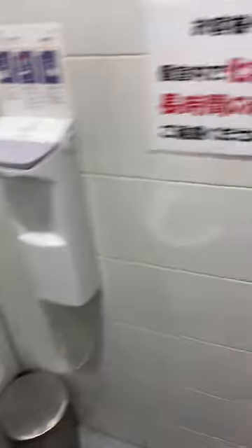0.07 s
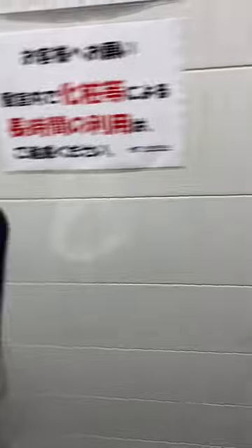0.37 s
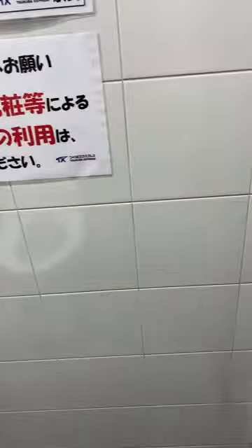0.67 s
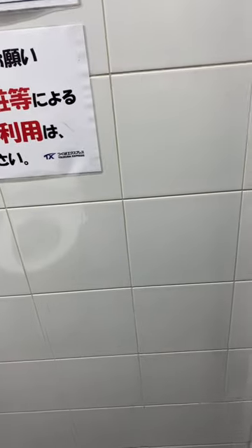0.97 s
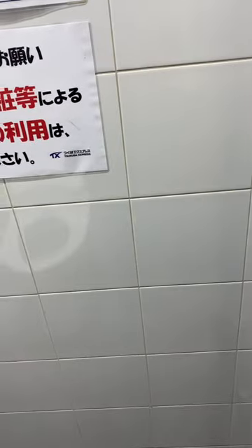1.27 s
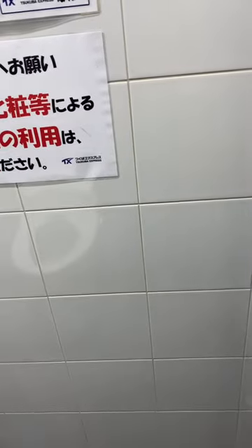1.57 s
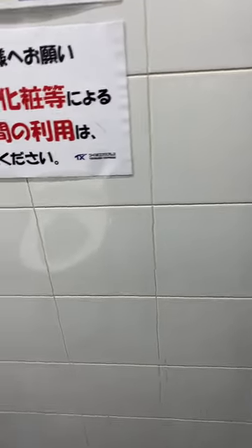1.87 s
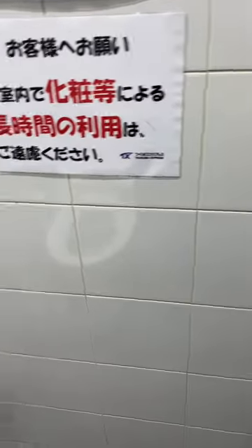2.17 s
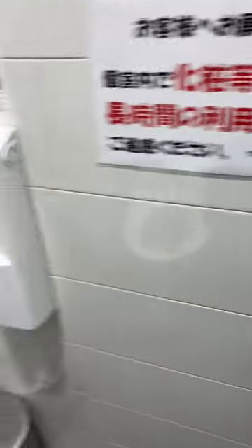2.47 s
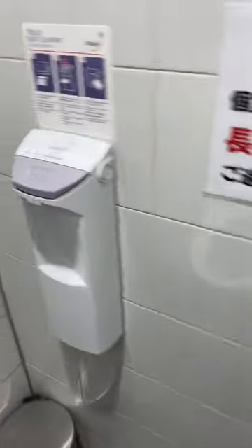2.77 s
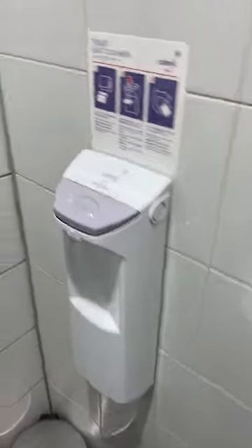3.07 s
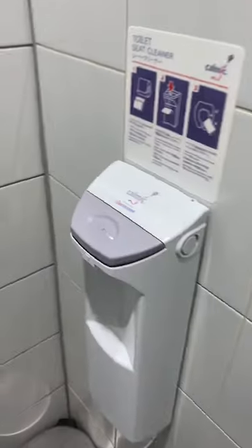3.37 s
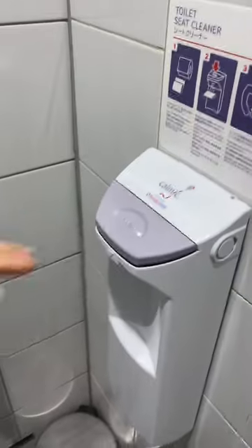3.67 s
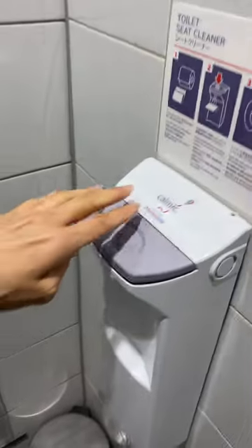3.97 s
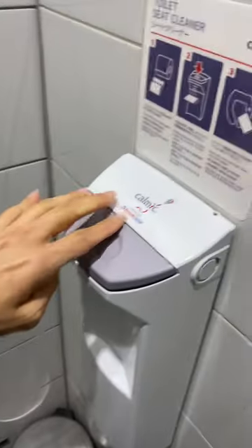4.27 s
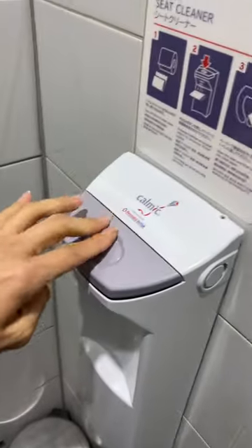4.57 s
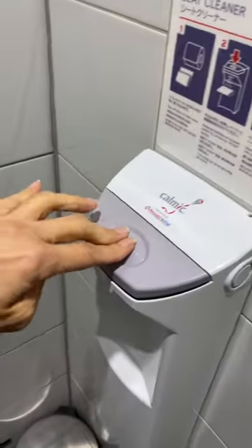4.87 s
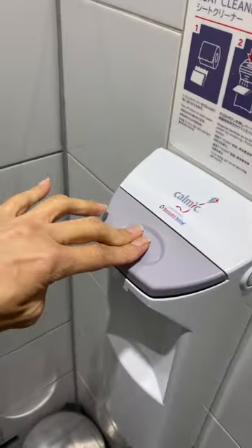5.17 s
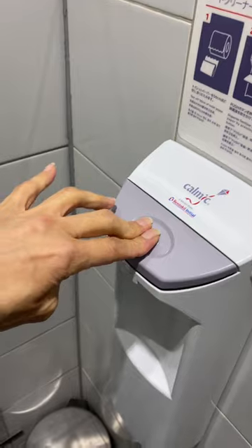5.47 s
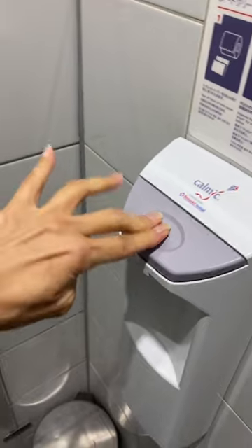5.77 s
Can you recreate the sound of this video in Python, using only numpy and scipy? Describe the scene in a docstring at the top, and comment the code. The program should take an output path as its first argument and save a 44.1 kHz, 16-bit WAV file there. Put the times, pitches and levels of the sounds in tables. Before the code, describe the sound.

A light knock on a partition is followed by a booming stall door, whose metal latch clatters around a small, hard restroom before the hinge gives a tiny chirp. Clothing brushes softly near the microphone. Later come faint finger taps on a plastic wall dispenser and one firm press, which clunks, sprays briefly and rattles as it releases. A low ventilation hum runs underneath throughout.

```python
"""An extractor fan hums in a small tiled toilet stall, and a sleeve rustles close by.
A hollow partition is bumped, then a door bangs shut: its panel booms, its steel latch clatters
round the hard room and its hinge chirps. Fingers tap and rub a plastic dispenser, then press it:
the shell gives a hollow clunk, liquid hisses through the nozzle, and the button rattles back."""
import sys
import numpy as np
from scipy import signal
from scipy.fft import rfft, irfft, next_fast_len
from scipy.io import wavfile
from scipy.ndimage import map_coordinates

SR = 44100
rng = np.random.default_rng(int(sys.argv[2]) if len(sys.argv) > 2 else 0)


def generate_wav(sig):
    """Save sig (samples, or channels by samples) to the path in sys.argv[1] as 16-bit PCM at SR."""
    pcm = np.round(np.clip(np.atleast_2d(sig).T, -1, 1) * 32767).astype(np.int16)
    wavfile.write(sys.argv[1], SR, pcm)


N = 261513
TIME = np.arange(N) / SR  # seconds through the scene
HIT = np.arange(SR) / SR  # seconds after a blow

# A COLOUR says how strong low and high pitches are next to each other (f/Hz, level/dB).
DUCT_COLOUR = [(10, -33), (22, -11.5), (38, -5), (62, -0.5), (76, -7), (95, 1), (130, 3.5), (165, -8),
               (188, -4), (215, -15.5), (370, -17.5), (470, -24), (850, -25.5), (960, -34), (1200, -31.5),
               (1800, -46), (5000, -53.5), (15500, -76.5)]  # air in the fan's duct
CLOTH_COLOUR = [(300, 4), (1500, 0), (2500, 1.5), (4000, -2), (7000, -6), (10000, -10), (12300, -11),
                (13500, -22.5), (16000, -24.5)]  # cloth rubbing on cloth
HISS_COLOUR = [(1500, -28.5), (3500, -11), (5500, 2.5), (7300, -6), (9500, -3.5), (12000, -7),
               (14000, -19.5)]  # quick, light brushes of cloth
PARTITION_COLOUR = [(150, -16.5), (300, -3.5), (430, -0.5), (560, -1), (700, -0.5), (880, -5), (990, -13),
                    (1400, -16.5), (4000, -61.5)]  # the partition's hollow body
EDGE_COLOUR = [(300, -25), (900, -2), (1400, -2), (2100, 2), (3600, -3), (5600, -11), (9500, -9),
               (12000, -13), (15500, -27)]  # its metal edge
WOOD_COLOUR = [(20, -40), (60, -15.5), (170, 1.5), (330, -5.5), (480, 1), (600, -2), (850, -5.5),
               (1300, -12.5), (2000, -24), (6000, -53.5)]  # a knock on the door
BOLT_COLOUR = [(300, -36), (1100, -4), (1500, -16), (1900, -14), (2150, 1), (2700, -1), (3200, 2),
               (3850, 0), (4250, -10), (5200, -11), (6000, -2), (7400, -5), (8600, -3), (9600, -9),
               (12300, -8), (13500, -16), (15500, -18)]  # the latch's sliding bolt
PLATE_COLOUR = [(300, -30), (900, -3), (1500, -4), (2300, 2), (3600, -1), (4300, -5), (5100, -2),
                (6200, -4), (7400, -4), (9700, -11), (11500, -7), (15500, -21)]  # the strike plate on the frame
TICK_COLOUR = [(200, 1.5), (900, 1.5), (1600, -1.5), (2500, 2.5), (3600, -4.5), (5400, -6.5), (8000, -16.5),
               (15500, -27.5)]  # a tick on plastic
NOZZLE_COLOUR = [(200, 1), (600, 4), (1000, -2.5), (1300, 1), (1800, -3.5), (2200, 0), (3100, -2.5),
                 (3400, -10.5), (3850, -6.5), (4400, -6.5), (5400, -9.5), (8000, -13.5), (15500, -19.5)]  # liquid leaving the nozzle

# NOTES ring when a thing is struck (f/Hz, level/dB, fade/s). A fade is the time to drop by 60 dB.
BOARD_NOTES = [(405, -3, .22), (461, 0, 0.245), (646.5, -1, 0.11), (742, -3, .08), (837, -9, .16),
               (888, -10, .12)]  # the partition's board
WOOD_NOTES = [(325.3, -4.5, .63), (458, -5.5, .6), (569, -1, 0.35), (651, -2, .7), (996, -11, .38),
              (1109.4, -7.5, 0.61), (1384, -13.5, 0.42)]  # the door's higher notes
BOLT_NOTES = [(2085, 0, .22), (2194, -2, .17), (2326, -3, .2), (2509, -5, .17), (3085, 4, .18),
              (3402, 0, .13), (3690, 0, .12), (4014, -2, .18), (5798, -5, .07), (6087, 0, .2),
              (8940, 0, .14)]  # the steel bolt
PLATE_NOTES = [(1195, -3, .4), (1744, 1, .28), (1820, -3, .28), (2310, 0, .18), (2617, -1, .2),
               (3790, -3, .18), (4893, -4, .25), (6330, -2, .15), (6920, 4, .14)]  # the strike plate
PANEL_NOTES = [(47, -12, 0.79), (72.6, -3, 0.3), (82.4, 0, .22), (110.7, 7.5, 0.13), (129.2, 0.34, 0.64),
               (151, -4, 0.28), (192, -19, 0.8)]  # the door's deep notes
SHELL_NOTES = [(245, -11.5, 0.13), (383, -16, 0.06), (498, -9, 0.065), (582, -1.5, 0.064),
               (729, -9.5, 0.05), (1200, -28, 0.09), (2140, -18, 0.022), (2470, -30, 0.1)]  # the dispenser's hollow shell
LID_NOTES = [(819, -0.5, 0.04)]  # its lid

# BANDS are the pitch ranges in which a part colours noise (f/Hz, width/Hz, level/dB).
LID_BANDS = [(473, 210, -2.5), (620, 250, 11), (820, 84, 1), (2650, 260, -6), (5000, 700, -14),
             (8500, 2700, -26)]  # the lid under the skin
HOLLOW_BANDS = [(557, 96, -1.5), (827, 106, 1), (1173, 70, -9), (2440, 89, -5), (2530, 78, -8),
                (2800, 50, -9), (3100, 60, -8), (3640, 70, -17), (3800, 50, -14), (4600, 50, -13)]  # the hollow under the nozzle
BUTTON_BANDS = [(550, 360, 2), (850, 280, 0)]  # the pump button

# the hum of the fan blades and the mains (f/Hz, level/dB)
HUM_TONES = [(59.2, -58.5), (129.2, -43.5), (242.2, -62), (301.5, -59.5), (393.0, -63), (586.8, -83),
             (699.8, -74)]
# the grille's whistle, louder or softer as the camera moves (t/s, level/dB, f/Hz)
GRILLE_WHISTLE = [(0, -68, 827), (2.0, -67.5, 848), (2.4, -66, 843), (2.9, -73, 828), (3.17, -64, 832),
                  (3.33, -57.5, 830), (3.48, -62, 828), (3.6, -64, 826), (3.88, -70, 836), (4.01, -60, 825),
                  (4.1, -66, 843), (4.3, -62.5, 860), (5.93, -61.5, 852)]
# the sleeve brushes the body (peak t/s, rub level/dB, hiss level/dB, half length/s)
SLEEVE_BRUSHES = [(0.02, -56.5, -64.5, 0.22), (0.52, -60, -87, 0.23), (0.945, -58.5, -69, 0.13),
                  (1.196, -59.5, -73.5, 0.24), (1.94, -58, -70.5, 0.14), (2.17, -47.5, -59, 0.1),
                  (2.876, -59.5, -57, 0.032), (3.037, -64.5, -65, 0.15), (3.969, -63.5, -68.5, 0.064),
                  (4.95, -72.5, -80.5, .14)]
# bumps on the partition (t/s, body level/dB, edge level/dB, board level/dB)
PARTITION_BUMPS = [(0.243, -58, -49.5, -70), (.251, -42, -43, -46), (.2615, -33.5, -42.5, -37),
                   (.294, -41, -72, -35), (.311, -44, -74, -30), (.346, -44, -74, -34)]
# door and latch hit the frame (t/s, wood level/dB, bolt level/dB, plate level/dB, tilt/dB per octave)
DOOR_CONTACTS = [(1.391, -65, -52.5, -70, 1.5), (1.408, -37, -47.5, -45, -3), (1.514, -51, -54, -58, -0.5),
                 (1.533, -40, -41, -38, -4), (1.538, -35, -35, -33, -4), (1.549, -31, -30, -46, -2),
                 (1.558, -30.5, -27, -46, -1.5), (1.571, -27, -20, -44.5, 2), (1.577, -30, -26.5, -44, 1.5),
                 (1.592, -29.5, -42, -60.5, 0.5), (1.612, -36, -47, -70, -3), (1.6505, -30, -42.5, -24, -2),
                 (1.658, -33.5, -43, -29.5, -2), (1.692, -36, -45.5, -31, 6),
                 (1.983, -51, -58.5, -52.5, -1.5)]
# the door panel thuds, each blow with its own tilt toward deeper or higher notes
# (t/s, level/dB, tilt/dB per octave)
DOOR_THUDS = [(1.419, -14, -3), (1.481, -13.5, 7), (1.531, -14.5, 3), (1.59, -18.5, -1),
              (1.6463, -19.5, -0.5), (1.771, -23, 7)]
# the hinge slips (t/s, level/dB, f/Hz, rise/s)
HINGE_CHIRPS = [(1.982, -43, 3480, .0015), (1.984, -53, 2400, .003), (1.986, -54, 6190, .006),
                (1.995, -52, 2080, .003)]
# taps on the dispenser
# (t/s, shell level/dB, lid level/dB, tick level/dB, scrape on top of tick/dB, tilt/dB per octave)
DISPENSER_TAPS = [(3.622, -44, -50, -45, -2, -6), (3.648, -40.5, -51, -53, 1, -9),
                  (4.199, -72, -73, -48.5, -9.5, 1.5), (4.52, -43.5, -48, -72, -4, 0),
                  (4.565, -44, -57, -66, -5, 1), (4.588, -58, -56, -55, -3, 4),
                  (4.612, -42.5, -50, -71.5, -2.5, 4), (4.657, -37.5, -44, -55, -4, 5.5),
                  (4.723, -67, -62, -58.5, -3, 0.5), (5.547, -16, -34, -38.5, 3, -1.5),
                  (5.686, -31.5, -32, -55.5, 6, -2), (5.726, -30.5, -32, -51.5, 7, -1),
                  (5.759, -48, -52, -38, 2.5, 1.5), (5.787, -34, -34, -41, 5.5, -1.5),
                  (5.795, -31.5, -28, -37, 3.5, -1)]
# fingertips drag on the lid (t/s, length/s, drag level/dB, squeak level/dB, squeak f/Hz)
FINGER_RUBS = [(4.392, .003, -64, -67, 2620), (4.579, 0.045, -51.5, -68.5, 2637),
               (4.651, 0.013, -55, -67, 2670), (5.151, 0.097, -69.5, -77, 2520)]
# the button rattles on its way back and again as it seats (t/s, hold/s, level/dB)
BUTTON_RATTLES = [(5.688, .048, -46), (5.792, .018, -42)]

# how long the tiles echo (f/Hz, fade/s)
TILE_ECHO = [(60, 1.3), (130, 1.6), (300, 1.3), (600, 0.72), (1000, 0.55), (2000, 0.26), (6000, .3),
             (15000, 0.13)]
# how alike left and right are for sound from all sides (f/Hz, likeness from 0 to 1)
SIDE_LIKENESS = [(100, 1), (250, 1), (550, 0.58), (1500, 0.51), (2800, 0.94), (5000, 0.54), (7200, 1),
                 (10000, 0.96), (15000, 0.59)]
# how far the left wave runs ahead of the right (f/Hz, phase/radians)
LEFT_LEAD = [(1900, 0), (2900, 1.7), (4200, 1.5), (5300, -1.64), (6400, 4), (7000, 2.5), (7800, 3),
             (8400, 4.5), (9700, 7.5), (11200, 5.5), (12800, 11), (14300, 2.5), (15600, 0.5)]
# how much louder the left is than the right (f/Hz, level/dB)
LEFT_BALANCE = [(40, 1), (130, -1.3), (500, -3.5), (1200, 0.5), (3000, -.5), (8000, -0.1)]


def amp(db):
    """Turn decibels into a number to multiply by."""
    return 10 ** (np.asarray(db) / 20)


def unit(x):
    """Scale a sound so that its average strength (rms) is 1."""
    return x / np.sqrt(np.mean(x ** 2) + 1e-20)


def along(points, hz):
    """Read a table of (f/Hz, value) at any pitch, on a log scale."""
    f, v = np.transpose(points)
    return np.interp(np.log(hz + 1), np.log(f), v)


def swell(s, hold, rise_s, fall_db_per_s):
    """A strength that rises until time s, holds, then dies away."""
    rise = np.clip(1 + (TIME - s) / rise_s, 0, 1)
    return rise * amp(-fall_db_per_s * np.maximum(TIME - s - hold, 0))


def hump(peak_s, half_s):
    """A bell-shaped rise and fall in strength."""
    return np.exp(-((TIME - peak_s) / half_s) ** 2)


def fade_in(rise_s):
    """Soften the start of a blow."""
    return 1 - np.exp(-HIT / rise_s)


def wobble(rate):
    """A smooth curve through rate random points a second."""
    return map_coordinates(rng.standard_normal(int(N * rate / SR) + 4), [TIME * rate])


def wavering(hz, rate, steady):
    """A randomly shaken tone; the steadier, the purer it sounds."""
    phase = 2 * np.pi * np.cumsum(hz * np.ones(N)) / SR
    shake = steady + wobble(rate) + 1j * wobble(rate)
    return unit(np.real(shake * np.exp(1j * phase)))


def filtered(x, response):
    """Change the strength and phase of each pitch in x by response(hz)."""
    size = next_fast_len(x.shape[-1] + 8192)
    hz = np.fft.rfftfreq(size, 1 / SR)
    return irfft(rfft(x, size) * response(hz), size)[..., :x.shape[-1]]


def diffuse(size):
    """White noise from all sides, as two close microphones hear it."""
    def shares(hz):
        alike = np.clip(along(SIDE_LIKENESS, hz), 0, 1)
        return np.sqrt([(1 + alike) / 2, (1 - alike) / 2])
    mid, side = filtered(rng.standard_normal((2, size)), shares)
    return np.array([mid + side, mid - side])


def rush(colour):
    """Steady stereo noise with the given colour."""
    return unit(filtered(diffuse(N), lambda hz: amp(along(colour, hz))))


def resonant(bands):
    """Stereo noise that is strong in the given bands and weak between them."""
    def peaks(f):
        return sum(amp(db) * (1j * f * width / (hz * hz - f * f + 1j * f * width)) ** 2
                   for hz, width, db in bands)
    return unit(filtered(diffuse(N), peaks))


def click(colour, tilt=0, size=2048):
    """A coloured click; a positive tilt, in dB per octave, brightens it above 1000 Hz."""
    hz = np.fft.rfftfreq(size, 1 / SR)
    strength = amp(along(colour, hz) + tilt * np.log2(np.maximum(hz, 1000)))
    # pack the energy at the very start (minimum phase)
    cepstrum = irfft(np.log(strength))
    cepstrum[1:size // 2] *= 2
    cepstrum[size // 2 + 1:] = 0
    pulse = irfft(np.exp(rfft(cepstrum)))
    return np.pad(pulse / np.linalg.norm(pulse), (0, SR - size))


def ring(notes, scatter_db):
    """Fading notes, at slightly new strengths for every blow."""
    return sum(amp(db + scatter_db * rng.standard_normal())
               * np.sin(2 * np.pi * hz * HIT) * np.exp(-np.log(1000) * HIT / fade)
               for hz, db, fade in notes)


def room(x, direct_db, tail_db, build_s):
    """The direct sound plus a tail of echoes that builds up off the tiles."""
    hz, t, noise = signal.stft(diffuse(SR), SR, nperseg=256)
    decay = np.exp(-np.log(1000) * t / along(TILE_ECHO, hz)[:, None])
    tail = signal.istft(noise * decay, SR, nperseg=256)[1][:, :SR]
    echoes = amp(tail_db) * tail * fade_in(build_s)
    echoes[:, 0] += amp(direct_db)
    return signal.fftconvolve(x[None], echoes, axes=1)


def walls(x, echo_db, count=10):
    """Weak, quick echoes off the close walls colour the sound."""
    delay_s = rng.uniform(.001, .014, count)
    sign = rng.choice([-1, 1], count)
    echoes = np.bincount((delay_s * SR).astype(int), amp(echo_db) * sign)
    echoes[0] = 1
    return signal.fftconvolve(x, echoes[None] / np.linalg.norm(echoes), axes=1)[:, :N]


def add(track, s, sound):
    """Mix a sound into the track at time s."""
    start = round(s * SR)
    track[:, start:start + sound.shape[1]] += sound[:, :N - start]


def fan():
    """Air rumbles in the duct, blades and mains hum, and the grille whistles faintly."""
    air = amp(-39.5 + 1.1 * wobble(3.9)) * rush(DUCT_COLOUR)
    hum = sum(amp(db + 3.2 * wobble(2.867)) * np.sqrt(2)
              * np.sin(2 * np.pi * hz * TIME + .6 * wobble(3.6)) for hz, db in HUM_TONES)
    s, db, hz = np.transpose(GRILLE_WHISTLE)
    whistle = amp(np.interp(TIME, s, db)) * wavering(np.interp(TIME, s, hz), rate=45, steady=1.1)
    # a brief low tone swells and fades
    low_tone = amp(-28) * hump(peak_s=0.618, half_s=0.042) * np.sin(2 * np.pi * 122 * TIME)
    return air + hum + whistle + low_tone


def sleeve():
    """Cloth slides on cloth as the arm moves; each brush swells it, and quick ones hiss."""
    sliding = amp(np.interp(TIME, [3.96, 4.36], [-62.5, -78]))  # the arm comes to rest
    s, rub_db, hiss_db, half_s = np.transpose(SLEEVE_BRUSHES)[:, :, None]
    strokes = hump(s, half_s)
    rub = np.linalg.norm([sliding, *(amp(rub_db) * strokes)], axis=0) * rush(CLOTH_COLOUR)
    hiss = np.sum(amp(hiss_db) * strokes, axis=0) * rush(HISS_COLOUR)
    return (rub + hiss) * amp(1.1 * wobble(60) + .6 * wobble(5))


def partition():
    """A light bump: the metal edge clacks and the hollow board rocks a few times."""
    out = np.zeros((2, N))
    for s, body_db, edge_db, board_db in PARTITION_BUMPS:
        body = room(click(PARTITION_COLOUR), direct_db=26.5, tail_db=-0.5, build_s=0.00096)
        edge = room(click(EDGE_COLOUR), direct_db=25.5, tail_db=-1.5, build_s=0.00092)
        notes = ring(BOARD_NOTES, scatter_db=2.5) * fade_in(0.0033)
        board = room(notes, direct_db=-3.5, tail_db=-43, build_s=.005)
        add(out, s, amp(body_db) * body + amp(edge_db) * edge + amp(board_db) * board)
    return out


def door_knocks():
    """Wood knocks on the frame, and the door's higher notes sing on between the knocks."""
    out = np.zeros((2, N))
    for s, db, *_ in DOOR_CONTACTS:
        knock = room(click(WOOD_COLOUR), direct_db=27, tail_db=0, build_s=0.0048)
        notes = ring(WOOD_NOTES, scatter_db=2.5) * fade_in(.012)
        add(out, s, amp(db) * (knock[:, :SR] + amp(-7.5) * notes))
    return out


def clack(colour, notes, tilt):
    """One steel part lands, chatters for a few milliseconds and rings."""
    snap = click(colour, tilt)
    chatter = amp(7.5) * diffuse(SR) * np.exp(-HIT / 0.0034)
    hit = room(snap, direct_db=15.5, tail_db=2.5, build_s=0.0027)
    hit += signal.fftconvolve(snap[None], chatter, axes=1)
    return hit[:, :SR] + amp(-15.5) * ring(notes, scatter_db=2.5)


def latch():
    """The bolt snaps over, then the door lands on the strike plate."""
    out = np.zeros((2, N))
    for s, _, bolt_db, plate_db, tilt in DOOR_CONTACTS:
        add(out, s, amp(bolt_db) * clack(BOLT_COLOUR, BOLT_NOTES, tilt))
        add(out, s, amp(plate_db) * clack(PLATE_COLOUR, PLATE_NOTES, tilt))
    return walls(out, echo_db=-20.5)


def door_boom():
    """Each thud against the frame makes the door's panel swing out and boom."""
    out = np.zeros((2, N))
    for s, db, tilt in DOOR_THUDS:
        notes = [(hz, level + tilt * np.log2(hz / 100), fade) for hz, level, fade in PANEL_NOTES]
        boom = ring(notes, scatter_db=1.5) * fade_in(0.0068)
        add(out, s, amp(db) * room(boom, direct_db=-0.5, tail_db=-43, build_s=0.086))
    return out


def hinge():
    """The hinge slips as it settles; each slip is a tiny tone that swells and dies."""
    out = np.zeros((2, N))
    for s, db, hz, rise_s in HINGE_CHIRPS:
        age = HIT / rise_s
        chirp = np.sin(2 * np.pi * hz * HIT) * age ** 2 * np.exp(2 - 2 * age)
        add(out, s, amp(db) * room(chirp, direct_db=5.5, tail_db=-44, build_s=0.0035))
    return out


def dispenser():
    """Fingers and the pump button tick on the hollow plastic shell and make it ring."""
    out = np.zeros((2, N))
    for s, shell_db, lid_db, tick_db, scrape_db, tilt in DISPENSER_TAPS:
        shell = amp(shell_db) * ring(SHELL_NOTES, scatter_db=3)
        lid = amp(lid_db) * ring(LID_NOTES, scatter_db=1)
        clunk = (shell + lid) * fade_in(0.0025)
        add(out, s, room(clunk, direct_db=4.5, tail_db=-45, build_s=0.0047))
        # plastic parts scrape for a moment instead of meeting cleanly
        grit = diffuse(SR) * np.exp(-HIT / 0.006) * fade_in(0.0013)
        tick = click(TICK_COLOUR, tilt)
        scrape = amp(scrape_db) * signal.fftconvolve(tick[None], grit, axes=1)
        tap = room(tick, direct_db=14, tail_db=scrape_db - 10, build_s=0.0025)
        add(out, s, amp(tick_db) * (tap + scrape))
    return out


def fingers():
    """Skin drags on the lid and keeps up a thin squeak while it slides."""
    drag, slide = np.zeros((2, N))
    for s, length, drag_db, squeak_db, _ in FINGER_RUBS:
        drag += amp(drag_db) * swell(s, length, rise_s=.015, fall_db_per_s=351)
        slide += amp(squeak_db) * swell(s, length, rise_s=.015, fall_db_per_s=380)
    s, *_, hz = np.transpose(FINGER_RUBS)
    squeak = wavering(np.interp(TIME, s, hz), rate=320, steady=0.8) * amp(2.5 * wobble(110))
    return drag * amp(1.8 * wobble(90)) * resonant(LID_BANDS) + slide * squeak


def spray():
    """One pump stroke: liquid hisses out in fine spurts, and the jet whistles at full pressure."""
    pressure = swell(5.553, hold=0.11, rise_s=0.0036, fall_db_per_s=225)
    flow = amp(-41.5) * (rush(NOZZLE_COLOUR) + resonant(HOLLOW_BANDS))
    spurts = amp(1.7 * wobble(250))
    jet = amp(-54) * hump(peak_s=5.622, half_s=.037) * wavering(hz=4762, rate=110, steady=2.6)
    return pressure * spurts * flow + jet


def button():
    """The button rattles in the hollow as it comes back."""
    travel = sum(amp(db) * swell(s, hold, rise_s=.008, fall_db_per_s=450)
                 for s, hold, db in BUTTON_RATTLES)
    return travel * amp(3.5 * wobble(160)) * resonant(BUTTON_BANDS)


def scene():
    """Everything in the stall, added together."""
    return (fan() + sleeve() + partition() + door_knocks() + latch() + door_boom() + hinge()
            + dispenser() + fingers() + spray() + button())


def record(dry):
    """The camera widens the treble by shifting its phase, favours the right and cuts the very top."""
    def response(hz):
        left = np.exp(.5j * along(LEFT_LEAD, hz)) * amp(along(LEFT_BALANCE, hz) / 2)
        return np.array([left, 1 / left]) * (hz < 15850)
    return filtered(dry, response)


dry = scene()
out = record(dry)
generate_wav(out)
```